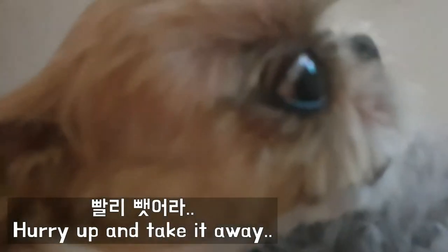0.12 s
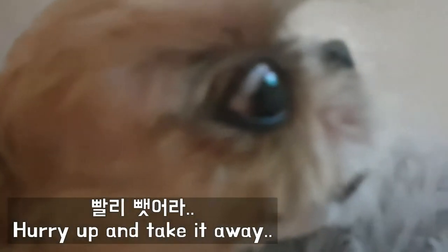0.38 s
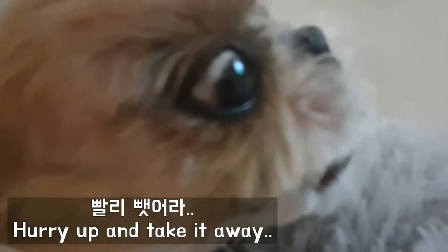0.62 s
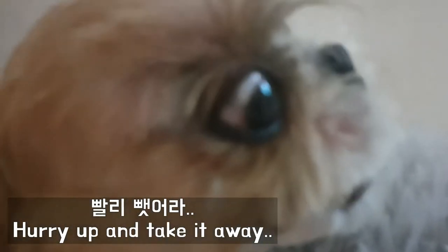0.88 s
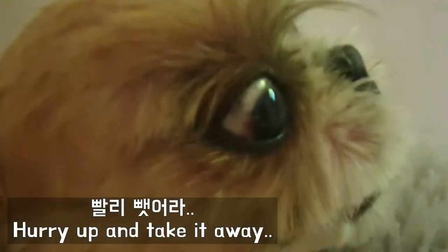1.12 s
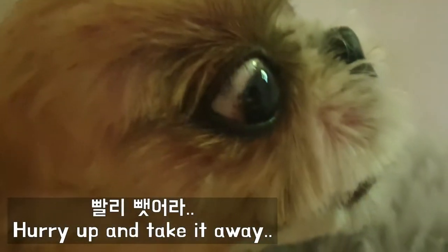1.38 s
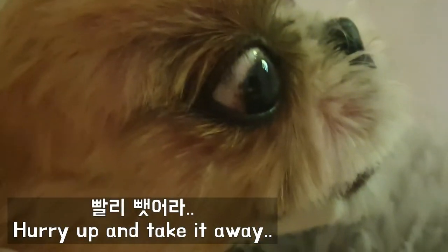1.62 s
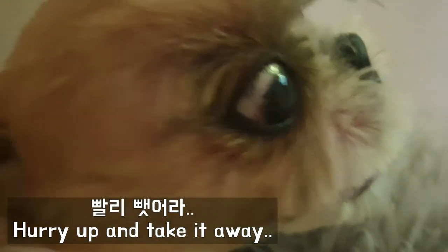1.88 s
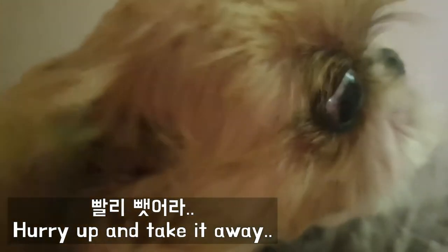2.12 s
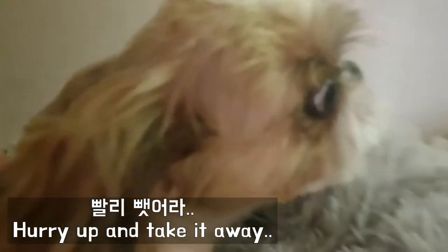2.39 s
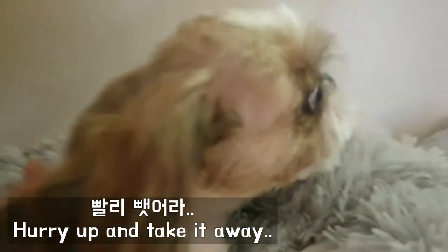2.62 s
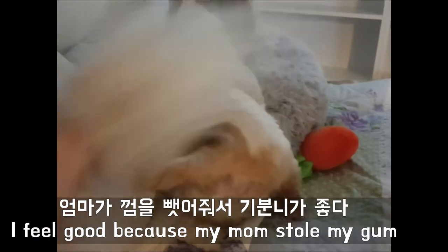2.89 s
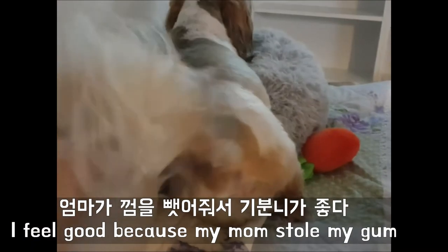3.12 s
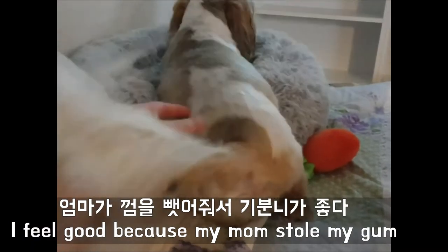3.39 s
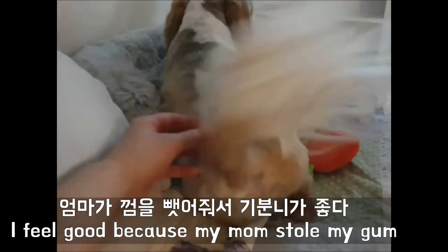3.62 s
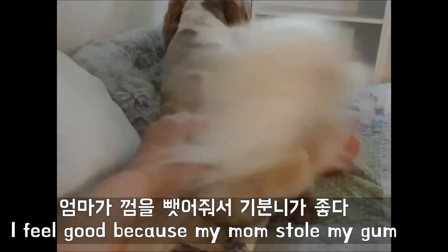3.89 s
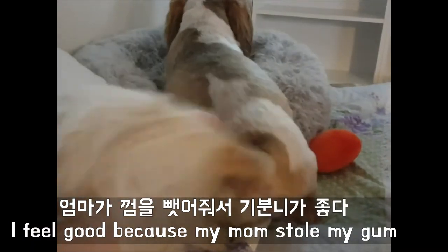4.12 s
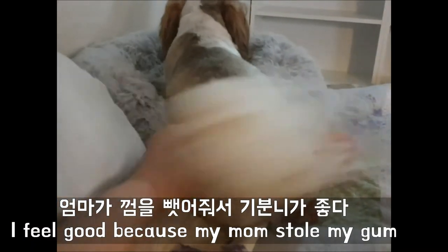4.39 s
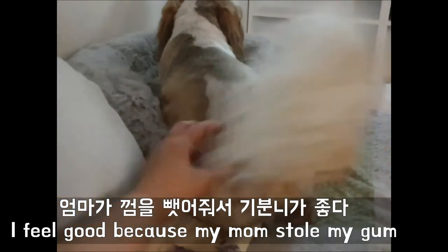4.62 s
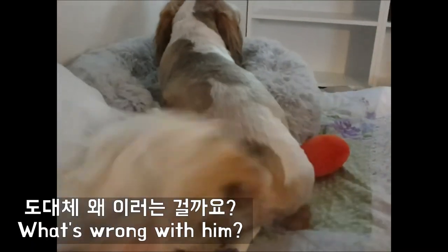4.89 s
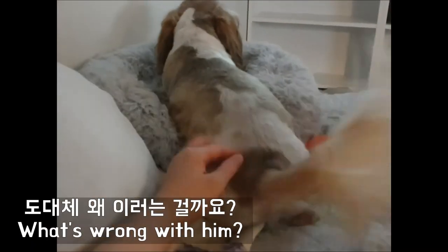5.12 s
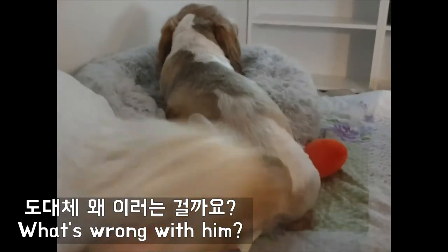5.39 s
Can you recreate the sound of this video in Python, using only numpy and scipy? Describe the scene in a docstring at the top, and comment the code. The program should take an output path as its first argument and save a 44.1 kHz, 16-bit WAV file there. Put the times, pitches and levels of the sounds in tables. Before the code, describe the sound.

Bumps and cloth scuffs open, with a short fluttering inhale through a small dog's snout. A slow rattling growl follows, pulsing about twenty times a second, pushed harder and whining near the end. After a hard cut, much quieter: tiny grunts, airy fur sweeps back and forth, low bedding rustle and hum. Handheld stereo phone, left open and clear, right dull and rumbling with handling.

```python
"""A small dog growls close to a hand-held phone: each throat flutter frees bursts of fold pulses and air through
mouth and nose resonances. A snuffling breath (filtered noise) comes before, a strained whine (harmonics) over it.
After a silent cut it grunts faintly and wags its tail on a soft bed: swelling bands of noise for fur and cloth, in a
quiet, humming room. A gripping hand rumbles and bumps; it muffles the right microphone, the left loses bass at times."""
import sys
import numpy as np
from scipy import signal
from scipy.fft import rfft, irfft, next_fast_len
from scipy.io import wavfile
from scipy.ndimage import uniform_filter1d, map_coordinates

SR = 44100
rng = np.random.default_rng(int(sys.argv[2]) if len(sys.argv) > 2 else 0)


def store_wav(level_fs):
    """Save 16-bit WAV to argv[1]."""
    pcm = np.round(np.clip(np.atleast_2d(level_fs), -1, 1) * 32767)
    wavfile.write(sys.argv[1], SR, pcm.T.astype(np.int16))


def rack_gain(trim_db):
    """Turn a fader trim in dB into the linear factor to multiply a signal by."""
    fader = np.asarray(trim_db, float)
    return 10 ** (fader / 20)


N = 242991
TIME = np.arange(N) / SR
CUT_START_S, CUT_END_S = 2.636, 2.669
# throat resonances: f/Hz, width/Hz, level/dB
THROAT_PEAKS = [(136.6, 29.7, 2.5), (268.7, 62, 1.5)]
# mouth resonances: f/Hz, width/Hz, level/dB
MOUTH_PEAKS = [(580, 149, 0.5), (800, 118, -2), (1130, 137, -6), (1650, 270, -22)]
# pushes of breath, each starting the mouth ring high: t/s, f/Hz
PUSHES = [(.68, 628.8), (2.058, 640.5)]
SECOND_PUSH_S = PUSHES[1][0]
IN_SECOND_PUSH = TIME >= SECOND_PUSH_S


def unit(x):
    """Scaled to rms 1."""
    return x / np.sqrt(np.mean(x ** 2) + 1e-20)


def curves(rows, rest=-120):
    """One value per sample for each column after the time; rest outside the rows."""
    s, *cols = np.transpose(rows)
    return [np.interp(TIME, s, c, rest, rest) for c in cols]


def filtered(x, response):
    """x times a complex response of frequency."""
    m = next_fast_len(N + SR // 2)
    return irfft(rfft(x, m) * response(np.fft.rfftfreq(m, 1 / SR)), m)[..., :N]


def resonant(x, peaks):
    """x through parallel band-pass resonances of alternating sign."""
    def response(f):
        total = 0
        for k, (centre, width, db) in enumerate(peaks):
            damping = 1j * f * width
            total = total + (-1) ** k * rack_gain(db) * damping / (centre ** 2 - f * f + damping)
        return total
    return filtered(x, response)


def dull(x, top_hz):
    """x through a steep causal low-pass."""
    return filtered(x, lambda f: 1 / (1 - (f / top_hz) ** 2 + 1.4j * f / top_hz) ** 2)


def wobble(rate):
    """A smooth random curve, rate knots a second."""
    return map_coordinates(rng.standard_normal(int(N * rate / SR) + 4), [TIME * rate])


def noise(spectrum):
    """Noise of rms 1 coloured by (Hz, dB) points."""
    hz, db = np.transpose(spectrum)
    colour = lambda f: rack_gain(np.interp(np.log(f + 1), np.log(hz + 1), db))
    return unit(filtered(rng.standard_normal(N), colour))


def airy(peaks):
    """Turbulence through resonances, rms 1."""
    return unit(resonant(rng.standard_normal(N), peaks))


def gliding(hz, width_hz):
    """Narrow noise around a moving centre, rms 1."""
    slow = filtered(rng.standard_normal((2, N)), lambda f: 1 / (1 + 2j * f / width_hz) ** 2)
    turn = 2 * np.pi * np.cumsum(hz) / SR
    return unit(slow[0] * np.cos(turn) + slow[1] * np.sin(turn))


def swells(rows, fall):
    """One gain curve per row (s, peak dB, s for 20 dB), straight in dB; a negative rise swaps rise and fall."""
    gains = []
    for s, db, rise, *_ in rows:
        away = np.maximum((s - TIME) / rise, (TIME - s) / (rise * fall))
        gains.append(rack_gain(db - 20 * away))
    return gains


def held(rows, attack_s, release_s):
    """Summed gains for rows (s, hold s, dB); attack and release are times for 20 dB."""
    gain = 0
    for s, hold, db in rows:
        away = np.maximum((s - TIME) / attack_s, (TIME - s - hold) / release_s)
        gain = gain + rack_gain(db - 20 * np.maximum(0, away))
    return gain


def spread(gain, pan_db):
    """Gains for left and right from a mean gain and a left-right difference in dB."""
    ratio = rack_gain(pan_db)
    return 2 * np.array([gain * ratio / (1 + ratio), gain / (1 + ratio)])


def air_noise():
    """Steady coloured air noise shared by both microphones, with extra noise of its own on the right."""
    # f/Hz, density/dB
    room_spectrum = [(120, -27), (200, 2), (409, -1), (456, -9), (821, -7), (950, -12), (1180, -8.5),
                     (1740, -25), (2800, -33.5), (9060, -37), (11300, -26), (15100, -24.5), (16000, -44)]
    air = noise(room_spectrum)
    return rack_gain(-70.5 + 0.24 * wobble(1.8)) * [air, .5 * air + 1.87 * noise(room_spectrum)]


def hum():
    """A slightly unsteady low tone that beats through regular nulls."""
    hum_hz, nulls_per_s, flatness = 117.4, 1.42, 1.26
    # t/s, level/dB
    hum_level = [(0, -52), (.72, -57), (2.63, -72), (2.7, -57), (3.4, -63.5), (4.4, -62.5), (5.1, -60.5),
                 (5.51, -63.5)]
    tone = unit(np.sin(2 * np.pi * hum_hz * TIME + .5 * wobble(8.9)) + 0.16 * airy([(hum_hz, 8, 0)]))
    null_s = np.where(TIME < CUT_START_S, 0.36, 3.17)  # one null before and one after the cut
    beat = np.tanh(flatness * np.sin(np.pi * nulls_per_s * (TIME - null_s)))
    return rack_gain(curves(hum_level)[0]) * beat * tone


def handling():
    """The gripping hand rumbles and bumps, unequally at the two microphones."""
    # steady grip: t/s, level/dB, left-right/dB
    grip_rest = [(0, -55, 3), (.8, -57.5, 0), (1.6, -54, 0), (2.1, -48.5, 0), (2.2, -48, -32),
                 (2.63, -57.5, -25), (2.67, -61.5, -2), (5.51, -57.5, -9)]
    # the hand squeezes: t/s, peak/dB, rise for 20 dB/s, left-right/dB
    squeeze_rows = [(.224, -57, 0.5, 23.5), (0.422, -46, -0.05, 2), (.66, -52, -2.8, -22),
                    (.81, -46, -0.28, 14), (1.3, -53, 0.8, 10), (1.67, -53, 0.4, 21),
                    (1.931, -42, -0.12, -11), (2.079, -34, -0.03, -1), (2.34, -64, -0.37, -19),
                    (2.761, -51, 0.24, -1), (3.06, -69.5, 1.2, 7), (3.292, -49.5, 0, -26),
                    (3.71, -53.5, 0.09, -19), (3.93, -61.5, 0.1, -14), (4.35, -73, -0.6, -10.5),
                    (4.78, -53.5, 0.22, 0), (4.93, -53.5, 0.1, -14), (5.08, -52.5, 0.1569, -12)]
    # soft bumps: t/s, peak/dB, rise for 20 dB/s, left-right/dB
    nudge_rows = [(0.139, -50, 0.1, -4), (0.344, -48, 0.07, -3), (2.7, -57, 0.17, -21),
                  (2.8, -51, -0.02, -1), (3.439, -68.5, 0.5, -9), (3.676, -56.5, 0.04, -15),
                  (4.39, -61.5, 0.06, -28), (4.87, -68, -0.2, -26.5), (4.99, -61.5, 0.37, -28),
                  (5.209, -57, 0.05, -13)]
    # grip rumble: f/Hz, density/dB
    grip_spectrum = [(13, -60), (22, -42.5), (40, -14), (60, 1), (91, -7), (113, 0), (130, -7),
                     (170, -18.5), (290, -120)]
    # bump rumble: f/Hz, density/dB
    bump_spectrum = [(47, -31), (80, -4.5), (156, 9), (238, -3), (313, -13), (500, -33.5), (650, -71),
                     (1100, -120)]
    rest_db, rest_pan_db = curves(grip_rest)
    steady = spread(rack_gain(rest_db + 2.0 * wobble(9.7)), rest_pan_db)
    squeezes = sum(spread(gain, row[3]) for gain, row in zip(swells(squeeze_rows, fall=0.97), squeeze_rows))
    grip = (steady + squeezes) * rack_gain(1.95 * wobble(15))
    bumps = sum(spread(gain, row[3]) for gain, row in zip(swells(nudge_rows, fall=0.99), nudge_rows))
    bumps = bumps * rack_gain(3.48 * wobble(30))
    shared = noise(grip_spectrum)
    return grip * [0.313 * shared + 0.3 * noise(grip_spectrum), shared] + bumps * noise(bump_spectrum)


def taps_and_grunts():
    """Taps on the phone and three faint low grunts: decaying sines."""
    # grunts from 2.75 to 2.86 s, taps otherwise: t/s, start level/dB, f/Hz, t60/s
    thump_rows = [(.0072, -35.5, 650, 0.019), (0.0124, -30, 174.7, 0.078), (2.754, -38, 139, 0.066),
                  (2.814, -38.5, 135, 0.086), (2.854, -39.5, 140, .05), (3.258, -59.5, 72.7, 0.06),
                  (3.665, -50.5, 126, 0.025)]
    out = np.zeros(N)
    for s, db, hz, t60 in thump_rows:
        t = np.maximum(TIME - s, 0)
        out += rack_gain(db - 60 * t / t60) * np.sin(2 * np.pi * hz * t)
    return out


def scuffs():
    """Scuffs on the bedding: decaying bursts of cloth noise."""
    # t/s, level before the rise and final gain/dB, rise/s, t60/s
    scuff_rows = [(.009, -50, 0.012, 0.12), (0.031, -57, 0.0082, 0.131), (2.7, -71, 0.047, 0.98),
                  (2.883, -55.5, 0.0038, 0.2), (3.679, -78, 0.0036, 0.11), (4.411, -76, 0.0039, 0.44),
                  (4.826, -71.5, 0.0042, 0.288)]
    # f/Hz, density/dB
    cloth_spectrum = [(350, -49.5), (600, -10), (798, -9), (934, -2), (1300, -8.5), (1600, -6.5),
                      (1790, -21), (2380, -14), (3220, -43), (3600, -30.5), (4680, -57), (7920, -120)]
    gain = np.zeros(N)
    for s, db, rise, t60 in scuff_rows:
        t = np.maximum(TIME - s, 0)
        gain += rack_gain(db - 60 * t / t60) * (1 - np.exp(-t / rise))
    return 1.35 * gain * noise(cloth_spectrum)


def fur():
    """Fur sweeps past: swelling noise, the finest hairs in a brighter band."""
    # t/s, peak before the overall gain/dB, rise for 20 dB/s, share of the finest hairs 0-1
    swish_rows = [(.039, -53.5, 0.0167, .2), (.13, -68, 0.2048, .2), (1.03, -73, 0.17, .2),
                  (2.03, -69.5, 0.34, .2), (2.34, -76.5, 0.35, .2), (2.61, -60.5, 0.03, .2),
                  (2.95, -77.5, 0.1, .4), (3.42, -84, 0.1, .4), (3.68, -78, 0.08, .3), (3.78, -84, .06, .6),
                  (3.94, -76, 0.065, .7), (4.045, -82, 0.03, .7), (4.19, -79, 0.06, .1),
                  (4.455, -74.5, 0.11, .45), (4.6, -84, 0.05, .5), (4.765, -76, 0.08, .55),
                  (5.09, -77.5, 0.09, .55), (5.4, -78, 0.09, .3)]
    # f/Hz, density/dB
    fur_spectrum = [(880, -48), (1500, -14), (3030, -19), (5440, -15.5), (6370, -9), (9470, -12),
                    (11700, -10.5), (16000, -20.5)]
    # finest hairs: f/Hz, density/dB
    fine_spectrum = [(5000, -40), (7000, -10), (9500, -9), (11000, 2), (13000, -4), (16000, -6)]
    sweeps = np.array(swells(swish_rows, fall=1))
    fine = np.transpose(swish_rows)[3]
    coarse_hair = (rack_gain(-93) + np.sqrt(1 - fine) @ sweeps) * noise(fur_spectrum)
    fine_hair = np.sqrt(fine) @ sweeps * noise(fine_spectrum)
    return rack_gain(4.5 + 1.7 * wobble(40)) * (coarse_hair + fine_hair)


def inhale():
    """A fluttering breath in: each snout band grows with the flow and changes as the throat catches."""
    # t/s, flow/dB, throat catch 0-1
    inhale_track = [(.135, -100, 0), (.148, -60.5, 0), (.194, -68, 0.01), (.326, -54.5, 0.08),
                    (.434, -63, 0.14), (.514, -63.5, 0.14), (.56, -58.5, 0.27), (.585, -52, 0.5),
                    (.614, -52, 1), (.624, -63, 0.9), (.665, -67.5, 1), (.69, -85, .8)]
    # one list per snout band: f/Hz, width/Hz, level/dB
    snout_bands = [
        [(699, 267, -3), (1030, 150, 0.5), (1580, 86, -4.5)],
        [(2533, 290, 5.5), (2958, 740, 3)],
        [(4330, 170, 0)],
    ]
    # per snout band: level at reference flow/dB, growth/(dB per dB), change at full catch/dB
    snout_law = [(-56.5, 1, -1.5), (-70, 1.5, 5.5), (-63.5, 1.67, -33)]
    reference_flow_db = -57
    flow_db, catch = curves(inhale_track)
    catch = np.clip(catch, 0, 1)
    air = 0
    for (db, growth, caught_db), band in zip(snout_law, snout_bands):
        level_db = db + growth * (flow_db - reference_flow_db) + caught_db * catch
        air = air + rack_gain(level_db) * dull(airy(band), 1.056 * band[-1][0])
    return rack_gain(2.2 * wobble(69.9)) * air


def smacks():
    """Wet clicks: short sines that fade by the cycle."""
    # t/s, level before the onset and fade/dB, f/Hz
    smack_rows = [(.152, -47.5, 950), (0.319, -48, 800), (.389, -54, 875), (0.552, -36, 940),
                  (0.573, -39, 930), (.593, -37, 1000), (.714, -42, 680), (0.726, -35, 670),
                  (.848, -37.5, 3540), (1.347, -23, 571), (3.0883, -49.5, 8100), (3.7144, -59, 10800)]
    out = np.zeros(N)
    for s, db, hz in smack_rows:
        cycles = np.maximum(TIME - s, 0) * hz
        out += rack_gain(db - 6.5 * cycles) * np.sin(2 * np.pi * cycles) * (1 - np.exp(-4 * cycles))
    return out


def pulse_train(opens, after_s, sizes):
    """Single-sample pulses at delays after each burst start."""
    at = (opens[:, None] + after_s * SR).astype(int)
    return np.bincount(at.ravel(), sizes.ravel(), N)[:N]


def levelled(x, floor):
    """x over its running mean, with a floor as a share of its peak."""
    return x / (np.abs(uniform_filter1d(x, SR // 8)) + floor * x.max())


def vocal_folds(pulses):
    """Fold pulses through throat and mouth resonances, evened in level."""
    voice = dull(resonant(-pulses, THROAT_PEAKS), top_hz=309.0)  # soft folds close without a click
    voice += dull(resonant(pulses, MOUTH_PEAKS[:2]), top_hz=1000) * rack_gain(-21.5)
    running_rms = np.sqrt(np.abs(uniform_filter1d(voice ** 2, SR // 8)))
    return voice / (running_rms + 0.00069 * voice.max())


def flap_ticks(opens, since_s, voice_db):
    """A wet tick as the flap parts, ever further ahead of the burst within each push."""
    # f/Hz, width/Hz, level/dB
    tick_peaks = [(705, 510, -0.5), (1220, 450, -5)]
    wet = lambda x: dull(resonant(x, tick_peaks), top_hz=1650)
    lead_s = 0.00101 + 0.00301 * since_s
    parts = opens - (lead_s * SR).astype(int)
    strength = rack_gain(2.4 * rng.standard_normal(len(opens)))
    ticks = wet(np.bincount(parts, strength, N)) / np.abs(wet(TIME == 0)).max()
    return ticks * rack_gain(voice_db - 8 - 8.5 * IN_SECOND_PUSH)


def mouth_ring(voice_db, shut, tail):
    """Two narrow bands of noise that sag in pitch in each push; the upper fades as the growl settles."""
    # one per push: sag/(Hz/s)
    ring_sag = [71, 330]
    first, second = [hz - sag * (TIME - s) for (s, hz), sag in zip(PUSHES, ring_sag)]
    ring_hz = np.where(IN_SECOND_PUSH, second, first)
    bright_db = -5 - 50 * np.maximum(TIME - .85, 0)
    ring = gliding(ring_hz, width_hz=100) + rack_gain(bright_db) * gliding(ring_hz + 170, width_hz=170)
    ring_db = voice_db + 0.5 - 21.5 * shut - 4 * IN_SECOND_PUSH
    steady_open, steady_shut = .52, .08  # share between bursts
    swing = steady_open + (steady_shut - steady_open) * shut + 0.28 * tail
    return rack_gain(ring_db) * swing * rack_gain(0.92 * wobble(50.7)) * ring


def tongue_rasp(opens, air_db, puff, tail, scatter_db):
    """Narrow gliding noise of air past the tongue, with an upper band while the tongue is high."""
    # t/s, f/Hz, level over the air flow/dB
    rasp_track = [(.69, 3000, -10), (.72, 3120, -1), (.74, 3170, -8), (.765, 3280, -3), (.785, 3320, -10),
                  (.85, 3500, -1.5), (.895, 3600, -11), (.905, 2700, -4), (1, 2530, -11),
                  (1.6, 2453, -10.5), (2, 2410, -18.5), (2.06, 2600, -4), (2.1, 2600, -6.5),
                  (2.16, 2500, -14), (2.23, 2550, -10), (2.3, 2450, -14), (2.55, 2400, -13)]
    rasp_hz, rasp_db = curves(rasp_track)
    air = gliding(rasp_hz, width_hz=250)
    air += rack_gain(-9.5) * (TIME < .9) * gliding(rasp_hz + 950, width_hz=400)
    burst_db = scatter_db * rng.standard_normal(len(opens))
    flicker = rack_gain(np.interp(TIME, TIME[opens], burst_db) + 2 * wobble(60))
    return rack_gain(air_db + rasp_db) * (.22 + .3 * puff + .12 * tail) * flicker * air


def nose_air(air_db, puff, scatter_db):
    """Nose hiss and narrow nose rings, both pulsed by the puffs."""
    # f/Hz, width/Hz, level/dB
    hiss_peaks = [(8800, 420, -2), (10300, 380, 0), (10900, 400, -3), (12200, 330, -10), (15200, 800, -11)]
    # rings at each burst: f/Hz, width/Hz, level at 270 Hz width/dB
    ring_peaks = [(4380, 220, -11), (5500, 220, -8), (7060, 260, 0)]
    nose = rack_gain(air_db) * (.62 + .25 * puff) * rack_gain(0.88 * wobble(40.4)) * airy(hiss_peaks)
    rings = 0
    for peak in ring_peaks:
        _, width_hz, db = peak
        rings = rings + rack_gain(scatter_db * wobble(18)) * airy([peak]) * rack_gain(db) * np.sqrt(width_hz / 270)
    return nose + rack_gain(air_db - 12) * (0.32 + .5 * puff) * rings


def growl():
    """Each flutter frees the vocal folds for a few cycles and lets a puff of air through."""
    # t/s, voice effort/dB, air flow/dB, voice pitch/Hz, mouth opening 0-1
    growl_track = [(.66, -80, -94, 199, 0.87), (.685, -64, -76, 198, 0.98), (.705, -64, -70.5, 200, 0.93),
                   (.725, -55, -64.5, 200, 1), (.775, -47.5, -64.5, 197, 1), (.805, -38.5, -59, 220, 0.81),
                   (.92, -38, -59, 207.5, 0.88), (1.17, -37, -58.5, 220.7, 0.64),
                   (1.3, -37.5, -57, 207.6, 0.25), (1.45, -40.5, -61.5, 210, 0.53),
                   (1.6, -42.5, -61.5, 164.5, 0.33), (1.72, -44, -62.5, 174, 0.26),
                   (1.84, -40, -63, 199.6, 0.45), (2.0, -41, -63, 176, 0.18), (2.06, -40, -61.5, 182, 0.56),
                   (2.095, -36, -63, 182, 0.72), (2.13, -37.5, -60.5, 217, 0.97),
                   (2.16, -36, -58, 223, 0.96), (2.21, -38.5, -67.5, 247.4, 1),
                   (2.3, -33.5, -66.5, 251, 0.9), (2.4, -34.5, -66, 232, 0.59),
                   (2.52, -34.5, -68.5, 240, 0.48), (2.57, -44.5, -72, 160, 0.5),
                   (2.62, -71, -61, 198.6, 0.98)]
    # each throat flutter: t/s, level over the voice effort/dB, length/s
    burst_rows = [(0.7613, -0.5, 0.0085), (0.8009, 0.5, .007), (0.8452, -2, 0.0067), (0.8848, 0, 0.0067),
                  (0.927, 1.5, 0.0078), (.9671, -2, .012), (1.0138, 2, 0.0067), (1.0545, 0.5, .009),
                  (1.104, 0.5, 0.0095), (1.1475, 0.5, 0.0088), (1.1912, -1.5, .009), (1.2406, 1, 0.0084),
                  (1.286, 0, 0.01), (1.3333, -2, 0.008), (1.3837, 0, .007), (1.431, 1, 0.0098),
                  (1.483, 0, 0.0078), (1.5303, -0.5, .012), (1.582, -2.5, 0.013), (1.631, 1.5, .008),
                  (1.682, 1.5, 0.012), (1.7347, -4, 0.0052), (1.7837, -2, 0.0057), (1.8308, 2, .006),
                  (1.8812, 0.5, 0.0063), (1.9296, 1.5, 0.0063), (1.9823, 0.5, .006), (2.032, -2.5, .016),
                  (2.092, 0, .006), (2.1397, -2, 0.0066), (2.1813, 2, 0.0076), (2.2289, -0.5, 0.0096),
                  (2.2765, 2, .014), (2.3243, -3.5, 0.011), (2.3779, 0, .024), (2.4346, 0.5, 0.015),
                  (2.4916, -0.5, 0.029), (2.5658, 1, .011)]
    scatter_db = 2.2
    voice_db, air_db, pitch_hz, opening = curves(growl_track)
    shut = 1 - np.clip(opening, 0, 1)
    starts_s, strength_db, length_s = np.transpose(burst_rows)
    opens = (starts_s * SR).astype(int)
    since_s = TIME[opens] - np.where(TIME[opens] < SECOND_PUSH_S, PUSHES[0][0], SECOND_PUSH_S)

    chance = rng.standard_normal((len(opens), 2, 10))
    periods_s = np.exp(.05 * chance[:, 0]) / pitch_hz[opens, None]
    after_s = np.cumsum(periods_s, axis=1) - periods_s[:, :1]
    sizes = rack_gain(chance[:, 1]) * np.exp(-(after_s / length_s[:, None]) ** 4)
    sizes[:, :2] *= 1.1  # the folds fly open hard, then the swing fades
    strength = rack_gain(strength_db[np.searchsorted(starts_s, TIME).clip(1) - 1])
    voice = vocal_folds(pulse_train(opens, after_s, sizes)) * strength

    lag_s = 0.0029 - 0.00303 * since_s  # the air follows the first swing, ever sooner
    pulses = pulse_train(opens, after_s + lag_s[:, None], sizes)
    puff = uniform_filter1d(uniform_filter1d(pulses, 300), 260)  # air flows while the folds swing
    puff = levelled(puff, floor=0.012) * strength * rack_gain(1.5 * wobble(20))
    strikes = uniform_filter1d(uniform_filter1d(pulses, 70), 50)  # each single closure chops the air
    strikes = levelled(strikes, floor=0.0008)
    tail = filtered(puff, lambda f: 1 / (1 + 2j * np.pi * f * .011))  # air dies away after a burst
    leak_open, leak_shut = .32, .07  # share of air escaping between bursts
    leak = leak_open + (leak_shut - leak_open) * shut
    flow = leak + (1 - leak) * (0.08 * puff + 0.25 * tail + 0.09 * strikes)

    chest_air = dull(airy(THROAT_PEAKS + [(343.0, 115, -5.5)]), top_hz=462.0)
    low = rack_gain(voice_db) * voice + rack_gain(voice_db - 4 - 13.5 * shut) * chest_air
    mouth = rack_gain(air_db + 13) * flow * dull(airy(MOUTH_PEAKS), top_hz=1860)
    mouth += mouth_ring(voice_db, shut, tail)
    rasp = tongue_rasp(opens, air_db, puff, tail, scatter_db)
    return low + mouth + rasp + nose_air(air_db, puff, scatter_db) + flap_ticks(opens, since_s, voice_db)


def whine():
    """The folds hold an unsteady note under strain, with air in its upper overtones."""
    # t/s, pitch/Hz, level/dB
    whine_track = [(2.07, 284.7, -57), (2.09, 289.9, -46), (2.116, 318.2, -43.5), (2.14, 279.6, -45),
                   (2.175, 285, -42.5), (2.205, 307.2, -47.5), (2.25, 298.8, -48), (2.3, 280.2, -47.5),
                   (2.345, 262, -50.5), (2.4, 250, -56.5), (2.55, 240, -55), (2.6, 229.7, -81)]
    # one per harmonic from the fundamental: level/dB
    overtones = [0, -0.5, -15.5, -18]
    # f/Hz, width/Hz, level/dB
    whine_air_peaks = [(950, 246, -1.9), (1110, 223, -1.6)]
    pitch_hz, level_db = curves(whine_track)
    turn = 2 * np.pi * np.cumsum(np.abs(pitch_hz) * (1 + .045 * wobble(90))) / SR
    note = sum(rack_gain(db + 3.5 * wobble(60)) * np.sin((k + 1) * turn) for k, db in enumerate(overtones))
    return rack_gain(level_db) * (note + rack_gain(-12.5 + 1.2 * wobble(40.35)) * airy(whine_air_peaks))


def bedding():
    """Wavering low rustle under the wagging dog."""
    # t/s, level/dB
    rustle_level = [(2.68, -74.5), (3.4, -75.5), (4, -77.5), (4.3, -74), (5.1, -71.5), (5.3, -80.5),
                    (5.51, -98)]
    # f/Hz, width/Hz, level/dB
    bedding_peaks = [(450, 110, 0)]
    return rack_gain(curves(rustle_level)[0] + 2.5 * wobble(5.5)) * airy(bedding_peaks)


def sniffs():
    """Breaths in and out through the nostrils: held gains on resonant turbulence."""
    # breaths out: t/s, hold/s, level/dB
    out_rows = [(3.46, 0.17, -74), (4.99, 0.057, -82)]
    # breaths in: t/s, hold/s, level/dB
    in_rows = [(3.082, 0.089, -76)]
    # breathing out: f/Hz, width/Hz, level/dB
    nostril_out_peaks = [(4350, 450, 1.5), (6440, 460, 3), (8100, 510, -5)]
    # breathing in: f/Hz, width/Hz, level/dB
    nostril_in_peaks = [(1506, 52, 11.5), (7200, 535, -1), (8050, 1340, -4.5), (10600, 1030, -2)]
    breath_out = held(out_rows, attack_s=.1, release_s=.1) * airy(nostril_out_peaks)
    return breath_out + held(in_rows, attack_s=.015, release_s=.4) * airy(nostril_in_peaks)


def brushes():
    """The tail brushes the bed rim: swells of resonant noise."""
    # t/s, peak/dB, rise for 20 dB/s
    brush_rows = [(4.42, -71, 0.05), (4.84, -73.5, 0.04)]
    # f/Hz, width/Hz, level/dB
    rim_peaks = [(1985, 650, -1), (2390, 320, -6)]
    return sum(swells(brush_rows, fall=1.5)) * airy(rim_peaks)


def scene():
    """The sound arriving at the two microphones."""
    room = air_noise() + hum()
    mono = taps_and_grunts() + scuffs() + fur() + inhale() + smacks() + growl() + whine()
    mono += bedding() + sniffs() + brushes()
    return room + handling() + mono


def left_microphone(x):
    """Open: a low cut, a bass shelf that switches, and a brief level dip."""
    # bass: t/s, level/dB
    bass_track = [(0, 0), (2.14, 0), (2.144, -25), (2.65, -25), (2.66, 0), (5.51, 0)]
    # the level dips briefly as the bass drops out: t/s, level/dB
    dip_track = [(2.141, 0), (2.144, -11), (2.175, -8), (2.205, 0)]
    left = rack_gain(5.5) * filtered(x, lambda f: 1j * f / (85 + 1j * f))
    highs = filtered(left, lambda f: f * f / (600 ** 2 + f * f))
    bass = rack_gain(curves(bass_track, rest=0)[0])
    return (bass * left + (1 - bass) * highs) * rack_gain(curves(dip_track, rest=0)[0])


def right_microphone(x):
    """Muffled: the hand passes mainly low notes, late, over the self-noise."""
    # self-noise: f/Hz, density/dB
    hiss_spectrum = [(100, 9), (600, -5), (1200, -7), (2000, -7), (5000, -11.5), (8300, -30), (10500, -10),
                     (16000, -8.5)]
    muffle = lambda f: 1 / ((1 + 1j * f / 215) * (1 + 1j * f / 1500) * (1 + (f / 1200) ** 4))
    return rack_gain(3.5) * filtered(x, muffle) + rack_gain(-74.5) * noise(hiss_spectrum)


def band_limit(x):
    """A steep low-pass at the top of the band."""
    return signal.sosfilt(signal.butter(12, 15770, fs=SR, output="sos"), x)


def record(dry):
    """Both microphones, silenced during the cut with a short fade on each side."""
    fade_s = .01
    outside = np.maximum((CUT_START_S - TIME) / fade_s, (TIME - CUT_END_S) / fade_s)
    mix = np.array([left_microphone(dry[0]), right_microphone(dry[1])]) * np.clip(outside, 0, 1)
    return band_limit(mix)


dry = scene()
out = record(dry)
store_wav(out)
```